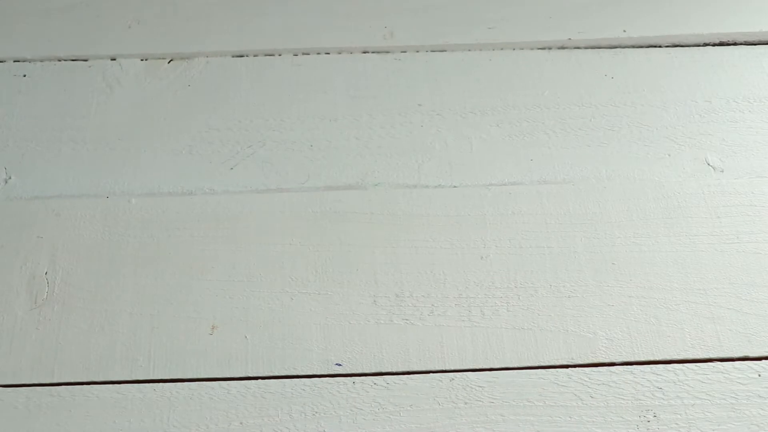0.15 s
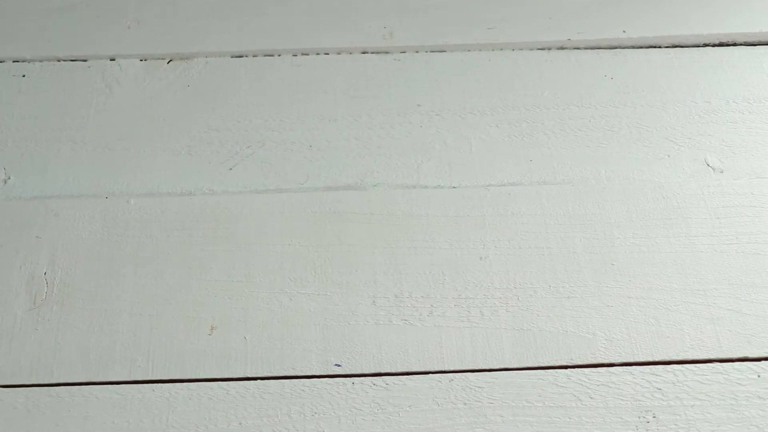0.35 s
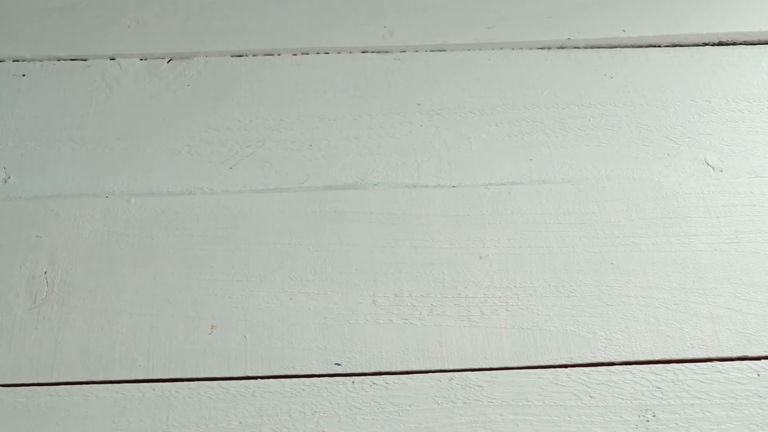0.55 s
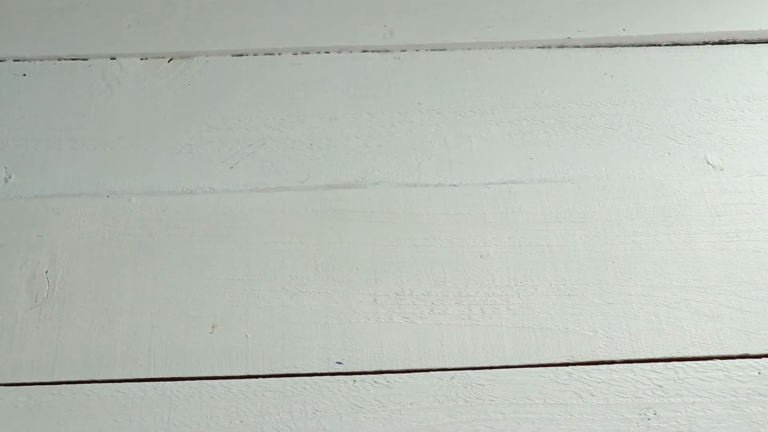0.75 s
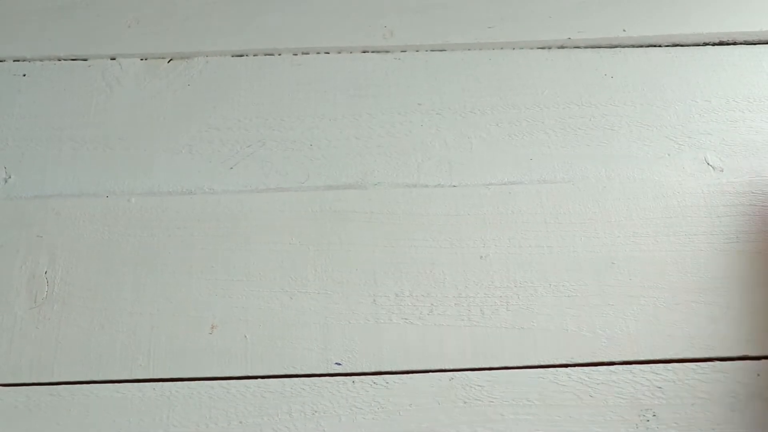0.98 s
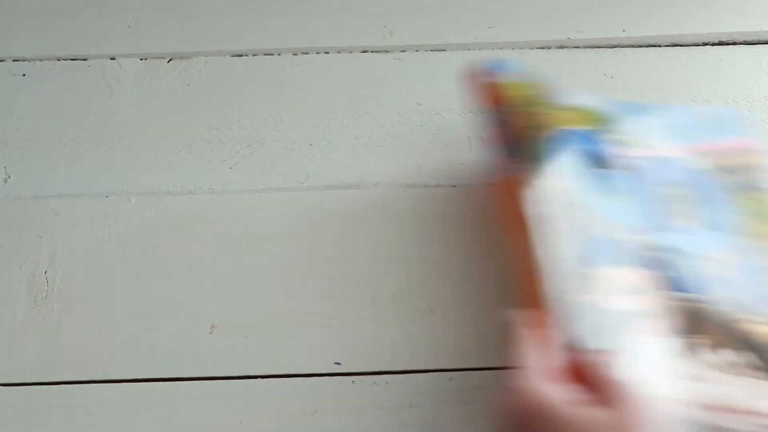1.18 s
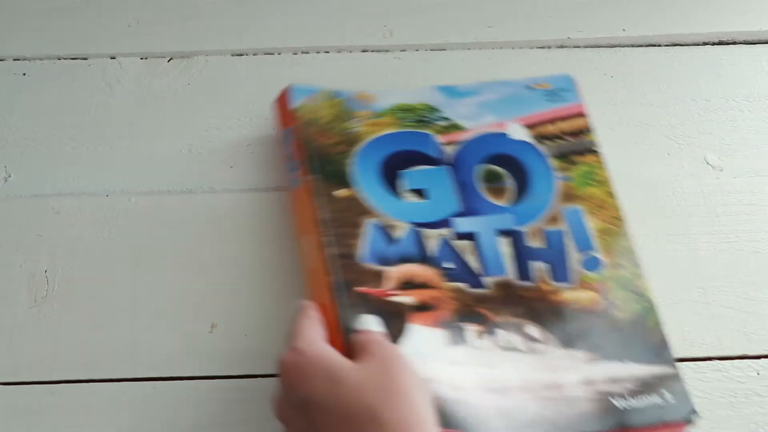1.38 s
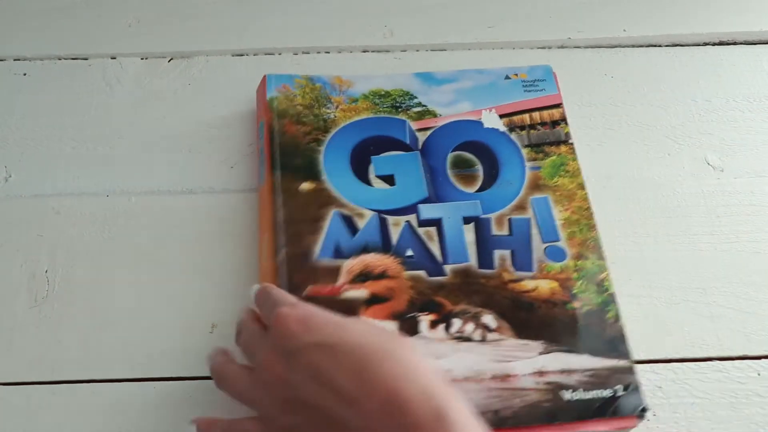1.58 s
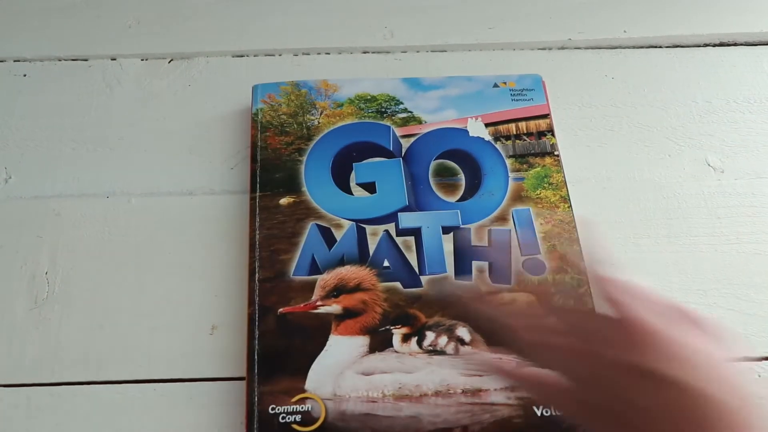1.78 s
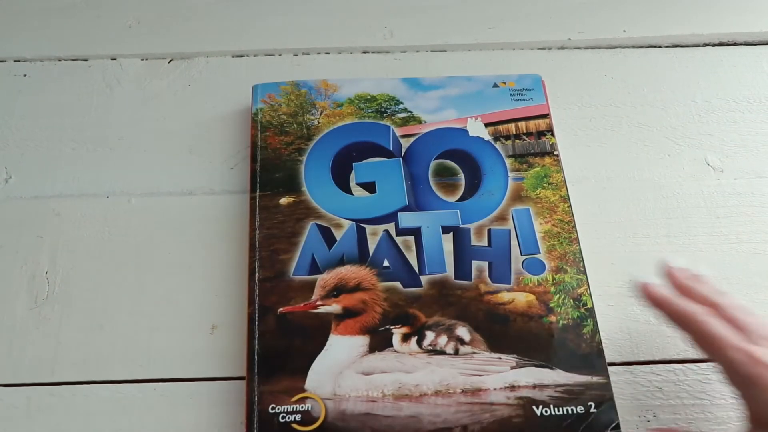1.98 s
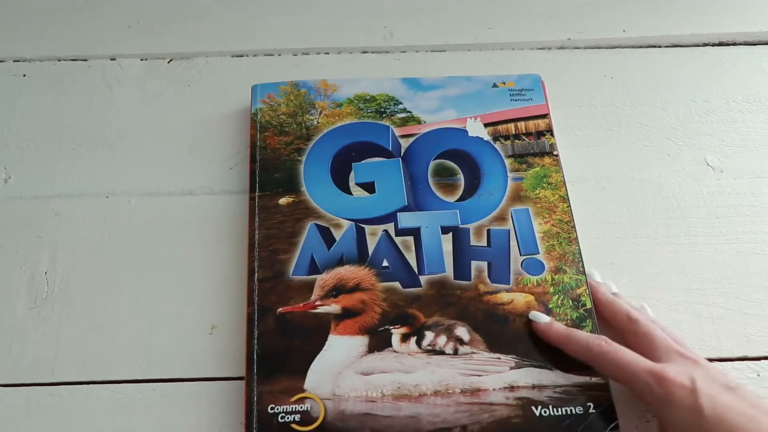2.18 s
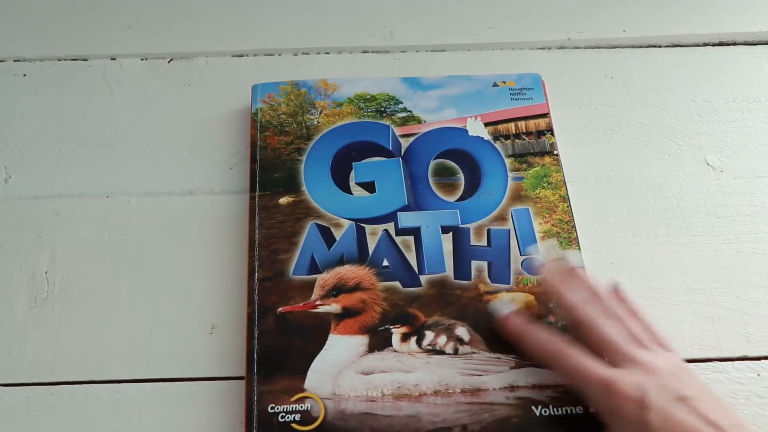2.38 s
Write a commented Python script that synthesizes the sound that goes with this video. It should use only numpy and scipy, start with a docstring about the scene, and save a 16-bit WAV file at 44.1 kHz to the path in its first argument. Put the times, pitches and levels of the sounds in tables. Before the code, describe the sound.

A paperback book flops onto a wooden table with a slap of pages. A light drag and a knock follow, then a book slides, thumps flat and is brushed by a hand. Close microphone in a small room.

```python
"""Paperback workbooks on a wooden plank table in a small room, close to a stereo microphone.
At 0.2 s a book flops down in a run of contacts: boards ring, pages thud and slap, the cover cracks.
A light drag rustles the pages, an edge knocks at 0.8 s, and a book is pushed into place, rubbing the wood.
It falls flat at 1.7 s; from 2 s a palm and fingertips brush the cover. The room rumbles faintly."""
import sys
import numpy as np
from scipy import signal
from scipy.fft import rfft, irfft, next_fast_len
from scipy.io import wavfile

SR = 44100
rng = np.random.default_rng(int(sys.argv[2]) if len(sys.argv) > 2 else 0)


def store_pcm(level_fs):
    """Save levels as 16-bit WAV."""
    pcm = np.round(np.clip(level_fs, -1, 1) * 32767).astype(np.int16)
    wavfile.write(sys.argv[1], SR, np.atleast_2d(pcm).T)


N = 108045

# landing contacts: start_s, rise_s, board_db, thud_hz, thud_db, slap_db, crack_db
CONTACTS = [(0.217, .0014, -48, 606, -36, -32.5, -41), (0.2234, .0003, -31, 640, -14, -29, -22.5),
            (0.2311, 0.00017, -32.5, 434, -12, -22, -14), (.2404, .001, -32, 343, -13.5, -40, -40),
            (.2512, 0.0023, -18.5, 243, -11.5, -19.5, -23.5), (0.2626, .0024, -42, 185, -15, -27.5, -35),
            (.283, 0.012, -32.5, 434, -27, -27.5, -32.5), (.307, 0.012, -42, 303, -23, -28, -67),
            (1.705, 0.0062, -28, 218, -17.5, -23.5, -17.5), (1.7131, 0.00088, -21, 370, -17.5, -45, -47),
            (1.7227, .001, -28, 213, -14, -52, -51), (1.7546, 0.00062, -33, 390, -14.5, -36, -32),
            (1.76, 0.0025, -29.5, 90, -39, -40, -37), (1.779, .0026, -31, 357, -27, -28.5, -55),
            (1.79, 0.00086, -36, 410, -26, -48, -60), (1.815, 0.0026, -43, 403, -34, -48, -60)]
# page slap spectrum: freq_hz, gain_db
SLAP = [(40, -46), (120, 2.5), (500, -4.5), (1000, 4.5), (1600, 1.5), (2200, -4), (4500, -14.5),
        (8000, -24), (16000, -30)]
# cover crack spectrum: freq_hz, gain_db
CRACK = [(40, -49), (150, 5), (700, 1.5), (1600, -3), (2700, -3), (3900, -1.5), (6000, -5), (8500, -8),
         (10500, -18.5), (16000, -25)]
BOARD_BLOOM_S = 0.0012


def undb(db):
    """Decibels to gain."""
    return 10 ** (np.asarray(db) / 20)


def times():
    """Sample times in s."""
    return np.arange(N) / SR


def over_hz(points, hz):
    """Interpolate (freq_hz, value) points over log frequency."""
    knots_hz, values = np.array(points, float).T
    return np.interp(np.log(hz + 1), np.log(knots_hz), values)


def colour(x, points):
    """Minimum-phase filter through (freq_hz, gain_db) points; keeps the power of white noise."""
    size = 2 * next_fast_len(N // 2 + SR // 4)
    gain = undb(over_hz(points, np.fft.rfftfreq(size, 1 / SR)))
    cepstrum = irfft(np.log(gain / np.sqrt(np.mean(gain ** 2))))
    cepstrum[1:size // 2] *= 2
    cepstrum[size // 2 + 1:] = 0
    return irfft(rfft(x, size) * np.exp(rfft(cepstrum)))[..., :N]


def noise(apart_hz=810):
    """White noise at two microphones: alike in the bass, unrelated in the treble."""
    size = 2 * next_fast_len(N // 2 + 1)
    hz = np.fft.rfftfreq(size, 1 / SR)
    alike = 1 / (1 + (hz / apart_hz) ** 2.16)
    mid, side = rfft(rng.standard_normal((2, size))) * np.sqrt(np.array([1 + alike, 1 - alike]) / 2)
    return irfft(np.array([mid + side, mid - side]))[:, :N]


def swell(rows):
    """Envelope of two-sided exponential peaks, summed in power."""
    t, power = times(), 0
    for peak_s, rise_s, decay_s, level_db in rows:
        falloff = np.maximum((peak_s - t) / rise_s, (t - peak_s) / decay_s)
        power += (undb(level_db) * np.exp(-np.minimum(falloff, 20))) ** 2
    return np.sqrt(power)


def burst(rows, points):
    """Bursts of coloured noise."""
    return colour(noise() * swell(rows), points)


def ring(blows, modes, bloom_s):
    """Blows excite damped modes that build up over bloom_s."""
    t, push = times()[:SR], np.zeros(N)
    for start_s, level_db in blows:
        push[int(start_s * SR)] -= undb(level_db)
    body = sum(undb(db) * np.sin(2 * np.pi * hz * t) * np.exp(-np.log(1000) * t / t60_s)
               for hz, db, t60_s in modes)
    return signal.fftconvolve(push, body * (1 - np.exp(-t / bloom_s)))[:N]


def landings(thud_cycles=9.5):
    """A book meets the table in several contacts and squeezes out the air beneath it."""
    # table top modes: freq_hz, level_db, t60_s
    boards = [(72.4, -11, 0.34), (98.7, -13, 0.29), (145.8, 0.5, 0.17), (183.2, -10, 0.12),
              (236.7, -6.5, 0.3), (304, -7, 0.077), (368, -8, 0.19), (467.4, -13, 0.12), (548, -12, 0.072),
              (620, -13, 0.081), (760, -19, 0.044), (907, -16, 0.048)]
    # joint modes of flat book and table: freq_hz, level_db, t60_s
    sway = [(73.4, 0, 0.36), (89.4, 8, 0.26), (368, 3, 0.17), (409.4, -2, 0.23), (575, 1.5, 0.19),
            (665, -2, 0.11)]
    # stiff cover modes: freq_hz, level_db, t60_s
    cover = [(1515, -13, 0.19), (2160, -15, 0.04), (3335, -10, 0.033), (3695, -0.5, 0.024),
             (4130, -1.5, 0.03), (5540, -9, 0.027), (7340, -5, 0.02)]
    # expelled air: peak_s, rise_s, decay_s, level_db
    puffs = [(0.276, 0.013, 0.052, -28), (.42, 0.037, 0.19, -44.5), (1.095, 0.011, 0.024, -28),
             (1.24, 0.068, 0.09, -47.5), (1.712, 0.0091, 0.036, -35)]
    # air spectrum: freq_hz, gain_db
    puff_colour = [(12, -50), (30, 5), (45, 4), (85, -5), (150, -16), (300, -10), (1000, -56)]
    # page flutter spectrum: freq_hz, gain_db
    flutter = [(15, -45), (55, -12), (100, -21), (180, -2.5), (400, -0.5), (700, 1), (1000, -25.5),
               (2000, -32), (8000, -61)]
    start_s, rise_s, board_db, thud_hz, thud_db, slap_db, crack_db = np.array(CONTACTS).T
    out = ring(zip(start_s, board_db), boards, BOARD_BLOOM_S)
    out += ring([(1.741, -29)], sway, bloom_s=0.013)
    for at_s, hz, db in zip(start_s, thud_hz, thud_db):
        out += ring([(at_s, db)], [(hz, 0, thud_cycles / hz)], bloom_s=0.00042)
    out += ring(zip(start_s, crack_db - 5), cover, bloom_s=0.00018)
    out = out + burst(puffs, puff_colour)
    paper = (thud_db - 11.5, 0.01, flutter), (slap_db, 0.011, SLAP), (crack_db, 0.0041, CRACK)
    for levels_db, decay_s, spectrum in paper:
        out += burst([(s, rise, decay_s, db) for s, rise, db in zip(start_s, rise_s, levels_db)], spectrum)
    return out


def clicks(boost_db=11, hard_rise_s=0.00042):
    """The stiff cover strikes the paint; the fastest contacts click hardest."""
    hits = np.zeros(N)
    for start_s, rise_s, *_, crack_db in CONTACTS:
        hits[int(start_s * SR)] += undb(crack_db + boost_db) * np.exp(-rise_s / hard_rise_s)
    return colour(hits, CRACK)


def knock(start_s=0.8042, lag_s=0.0121):
    """A stiff edge clacks on the wood, then skids with a rasp as the planks boom."""
    # edge spectrum: freq_hz, gain_db
    edge_colour = [(50, -40), (150, -8.5), (400, -8), (750, -15), (1150, -6), (1550, 3.5), (2050, -11),
                   (2500, -4.5), (3300, -16), (4700, -10), (6500, -21.5), (7600, -21), (10000, -32),
                   (16000, -36)]
    # plank modes: freq_hz, level_db, t60_s
    planks = [(160.7, -0.5, 0.12), (300, 2, 0.094), (344, 7.5, 0.11)]
    clack = (start_s, 0.0003, 0.0058, -17)
    rasp = (start_s + lag_s, 0.004, 0.025, -28.5)
    return burst([clack, rasp], edge_colour) + ring([(start_s + lag_s, -28)], planks, BOARD_BLOOM_S)


def sliding(grains_per_s=1200, grain_s=0.00021, grain_share=0.17, judder_hz=70.3, judder_db=0.8):
    """The cover catches on bumps in the paint; a faster push is louder and fuller."""
    # light drag: time_s, level_db
    drag = [(0.329, -46.5), (.39, -43), (.45, -44), (.51, -41.5), (.58, -41.5), (.67, -44), (.73, -49.5),
            (.8, -49.5)]
    # push into place: time_s, level_db
    push = [(.83, -49.5), (.92, -41), (.98, -37.5), (1.061, -34), (1.125, -27), (1.19, -26.5), (1.234, -25),
            (1.3, -30.5), (1.39, -37), (1.44, -38.5), (1.484, -36.5), (1.54, -46), (1.68, -54)]
    # slow rub spectrum: freq_hz, gain_db
    slow_rub = [(60, -9.5), (200, 4.5), (380, 3.5), (700, 0.5), (1500, -0.5), (2400, -4.5), (4500, -7),
                (8000, -13.5), (11000, -19.5), (16000, -24)]
    # fast rub spectrum: freq_hz, gain_db
    fast_rub = [(60, -16), (160, -2), (240, -26), (330, -6.5), (600, 0.5), (1000, -3.5), (1550, -2.5),
                (2300, -6.5), (4500, -12), (8000, -21.5), (11000, -24), (16000, -25)]
    crossfade_db, right_lag_s = -31, 0.00017
    level_db = np.interp(times(), *np.array(drag + push).T, left=-100, right=-100)
    catches = (rng.random(N) < grains_per_s / SR) * rng.exponential(size=N)
    grains = np.maximum(signal.lfilter([1], [1, -np.exp(-1 / (grain_s * SR))], catches), 0)
    roughness = np.sqrt(1 - grain_share + grain_share * grains / grains.mean())
    judder = np.interp(times() * judder_hz, np.arange(N), rng.standard_normal(N))
    friction = noise() * roughness * undb(level_db + judder_db * judder)
    fast = 1 / (1 + undb(crossfade_db - level_db) ** 2)
    rub = colour(friction * fast, fast_rub) + colour(friction * (1 - fast), slow_rub)
    left, right = rub + rub_resonances(friction)
    return np.array([left, np.roll(right, int(right_lag_s * SR))])


def rub_resonances(friction, passing_s=0.061):
    """Each resonance swells and fades as the book passes its spot."""
    # book and table resonances: freq_hz, width_hz, level_db, peak_s
    modes = [(346, 22, -12, 1.104), (470, 56, -15, 1.13), (490, 24, -12.5, 1.32), (622, 47, -9.5, 1.274),
             (790, 17, -9, 1.22), (896, 35, -11.5, 1.264), (1105, 62, -12, 1.09), (1250, 56, -17, 1.28),
             (1540, 120, -8, 1.135), (1750, 110, -22, 1.2), (950, 55, -5, 0.41)]
    out = 0
    for hz, width_hz, level_db, peak_s in modes:
        near = np.exp(-0.5 * ((times() - peak_s) / passing_s) ** 2)
        band = signal.lfilter(*signal.iirpeak(hz, hz / width_hz, fs=SR), friction * near)
        out += undb(level_db) * np.sqrt(SR / np.pi / width_hz) * band
    return out


def bumps():
    """Hand and spine bump softly, with a scuff of paper."""
    # touches: start_s, ring_db, scuff_db
    touches = [(0.178, -33, -35), (0.663, -42, -31), (1.529, -33.5, -45), (1.5567, -27.5, -40.5),
               (1.615, -29.5, -40), (1.6375, -34, -38.5), (2.232, -52, -39.5)]
    # spine modes: freq_hz, level_db, t60_s
    spine = [(161.6, -12, 0.28), (322, -2, 0.065), (363.4, 2, 0.068), (487, -5.5, 0.075)]
    body = ring([(start_s, db) for start_s, db, _ in touches], spine, bloom_s=0.0022)
    return body + burst([(start_s, 0.001, 0.007, db) for start_s, _, db in touches], SLAP)


def ticks():
    """The glossy cover snaps as it flexes: one click and a brief fizz each time."""
    # snaps: start_s, level_db, left_minus_right_db, tilt_db_per_octave, decay_s, click_db
    snaps = [(0.049, -39, -8, 9, 0.002, 9), (.070, -32.5, -3, -3, 0.0022, 2),
             (0.0927, -37, -6, 7, 0.0018, 4), (0.1554, -30.5, -2, 2, 0.002, -4),
             (0.323, -32, -2, 0, .002, -2), (0.427, -34, -3, -1.5, 0.0047, 8),
             (0.475, -33.5, 1, 1, 0.0028, 12), (.5135, -30.5, -2, 1, 0.0054, 9),
             (0.8055, -22, 5, -2, .0015, 2), (1.473, -21.5, 5, -3.5, 0.0022, 8.5)]
    # snap spectrum before tilt: freq_hz, gain_db
    snap_colour = [(100, -25), (1500, -4), (4000, 2), (8000, 3.5), (11000, -7), (16000, -3)]
    out = 0
    for start_s, level_db, pan_db, tilt, decay_s, click_db in snaps:
        snap = undb(-2.5) * noise() * swell([(start_s, 0.0001, decay_s, 0)])
        snap[:, int(start_s * SR)] += undb(click_db)
        tilted = [(hz, db + tilt * np.log2(hz)) for hz, db in snap_colour]
        out += colour(snap, tilted) * undb(level_db + np.array([[pan_db], [-pan_db]]) / 2)
    return out


def hands():
    """Skin rubs the book: a dull palm stroke and bright fingertip wipes."""
    # palm stroke: peak_s, rise_s, decay_s, level_db
    palm = [(2.02, 0.068, 0.043, -36.5)]
    # palm spectrum: freq_hz, gain_db
    palm_colour = [(50, -12), (100, 12), (190, 6.5), (350, -4), (700, -9), (1400, -4), (2500, -12.5),
                   (6000, -22), (16000, -39)]
    # fingertip wipes: peak_s, rise_s, decay_s, level_db
    wipes = [(.085, 0.015, 0.026, -52.5), (2.229, 0.0099, 0.019, -50.5), (2.296, 0.0064, 0.0099, -37),
             (2.316, .006, 0.011, -45), (2.445, 0.025, .05, -42)]
    # fingertip spectrum: freq_hz, gain_db
    wipe_colour = [(200, 2), (1000, 3.5), (3000, 7.5), (8000, 4.5), (11000, -1), (16000, -5)]
    return burst(palm, palm_colour) + burst(wipes, wipe_colour)


def pages():
    """Pages rustle during the drag."""
    # rustles: peak_s, rise_s, decay_s, level_db
    rustles = [(.492, .016, .03, -41.5), (.55, .02, 0.043, -44.5)]
    # rustle spectrum: freq_hz, gain_db
    rustle_colour = [(200, -28), (1500, -12), (2500, -2), (4200, 4), (6000, -5), (9000, -10), (16000, -22)]
    return burst(rustles, rustle_colour)


def room(direct, gap_s=0.0047):
    """Diffuse reflections; each octave band decays at its own rate."""
    # reflection spectrum: freq_hz, gain_db
    tail_colour = [(50, -9.5), (150, -3), (350, -1.5), (700, -2.5), (1500, 4), (4000, -1.5), (14000, 1)]
    # reverberation time: freq_hz, t60_s
    decay = [(100, 0.48), (500, 0.43), (1500, 0.42), (5000, 0.39), (14000, 0.14)]
    t, hz = times()[:SR], np.fft.rfftfreq(SR, 1 / SR)
    spectrum = rfft(colour(noise(), tail_colour)[:, :SR])
    centres_hz = 125 * 2. ** np.arange(8)
    tail = 0
    for centre_hz, weights in zip(centres_hz, np.eye(8)):
        rate = np.log(1000) / over_hz(decay, centre_hz)
        band = irfft(spectrum * over_hz(list(zip(centres_hz, weights)), hz))
        tail += band * np.exp(-rate * t) * np.sqrt(2 * rate / SR)
    onset = np.clip(t / gap_s - 1, 0, 1)
    return signal.fftconvolve(direct, tail * onset, axes=1)[:, :N]


def ambience():
    """Steady room rumble."""
    # rumble spectrum: freq_hz, gain_db
    rumble = [(20, -40), (45, -0.5), (80, 4.5), (120, -5.5), (170, -3), (300, -5), (500, -15.5),
              (1400, -18), (3000, -23.5), (7000, -29), (11000, -37), (16000, -41.5)]
    return colour(noise(), rumble)


def scene():
    """Books and hands, their reflections, and the quiet room."""
    direct = landings() + clicks() + knock() + bumps() + ticks() + sliding() + hands() + pages()
    return direct + undb(-5) * room(direct) + undb(-46) * ambience()


def record(dry):
    """Two microphones of slightly different colour, then a steep low-pass."""
    # microphone balance: freq_hz, left_minus_right_db
    balance = [(60, 1), (125, 2), (330, -0.5), (600, 0.5), (1100, 1.5), (2400, -1.5), (4400, -1.4),
               (8000, 0.2), (14000, -4)]
    cutoff_hz = 15850
    size = 2 * next_fast_len(N // 2 + SR // 10)
    lean_db = over_hz(balance, np.fft.rfftfreq(size, 1 / SR))
    heard = irfft(rfft(dry, size) * undb(np.array([lean_db, -lean_db]) / 2))[:, :N]
    return signal.sosfilt(signal.ellip(10, 0.1, 80, cutoff_hz, fs=SR, output="sos"), heard)


dry = scene()
out = record(dry)
store_pcm(out)
```